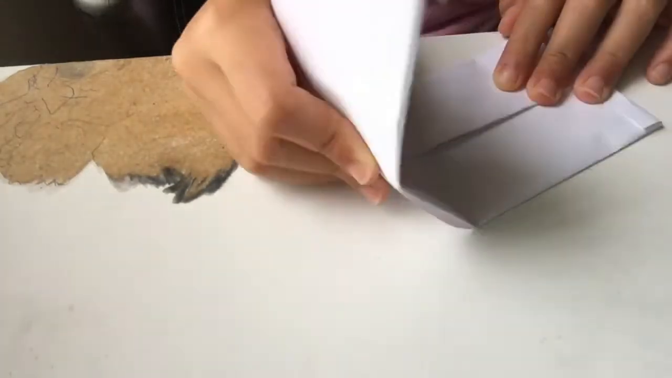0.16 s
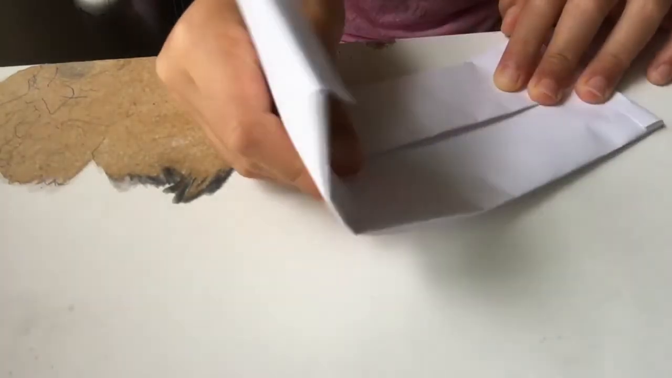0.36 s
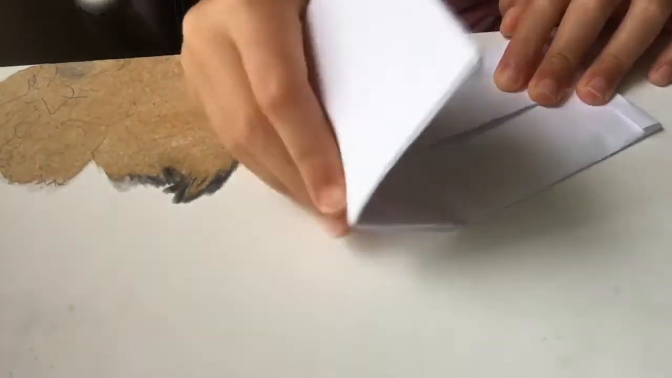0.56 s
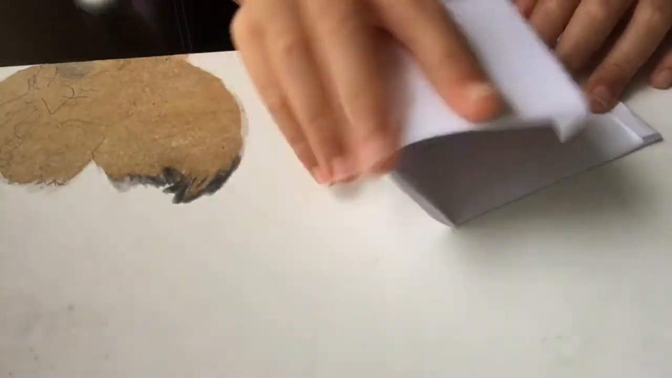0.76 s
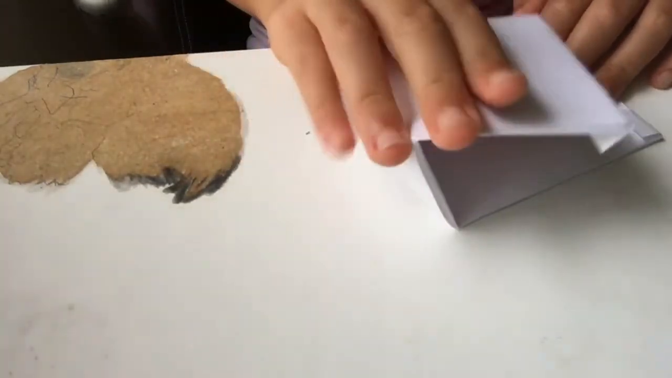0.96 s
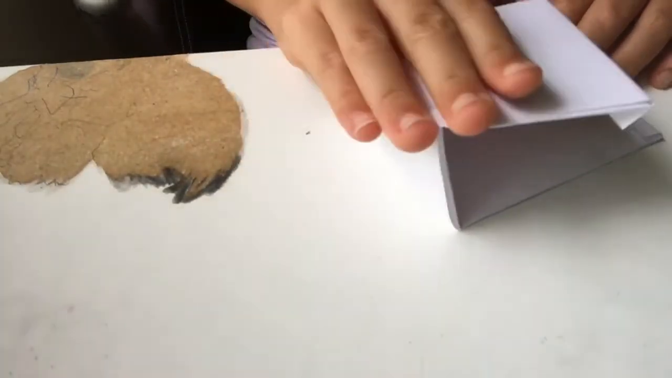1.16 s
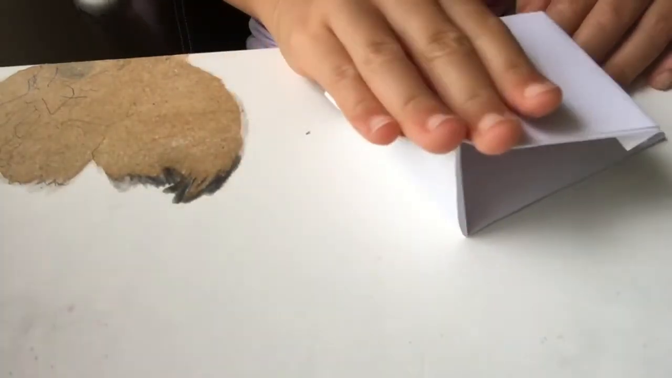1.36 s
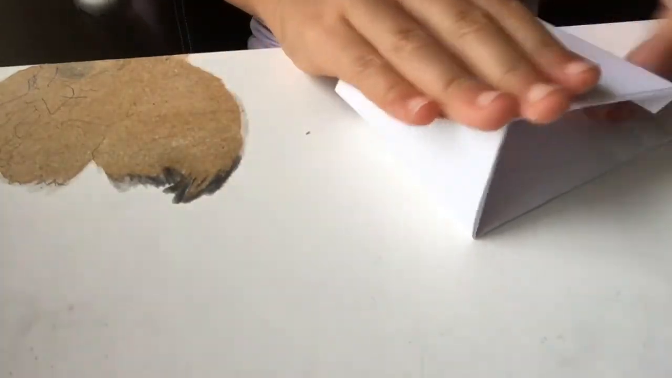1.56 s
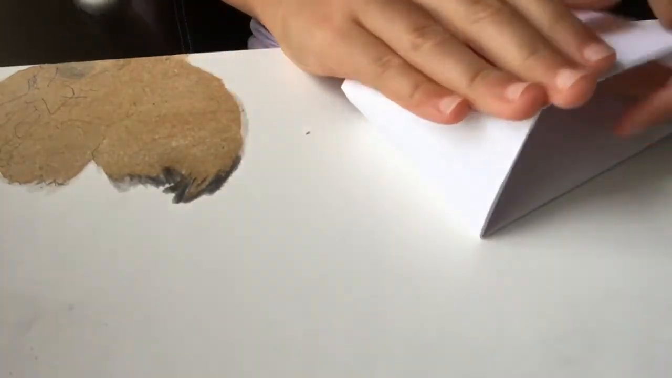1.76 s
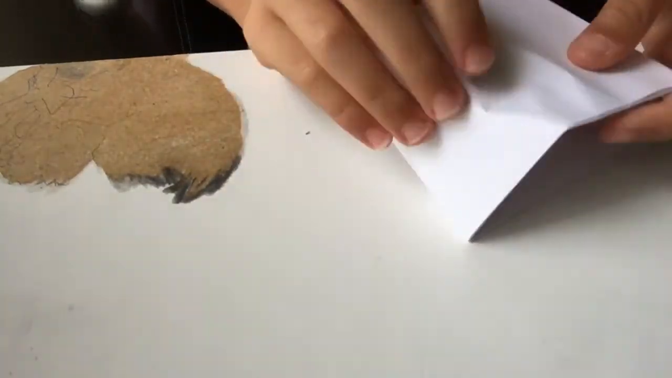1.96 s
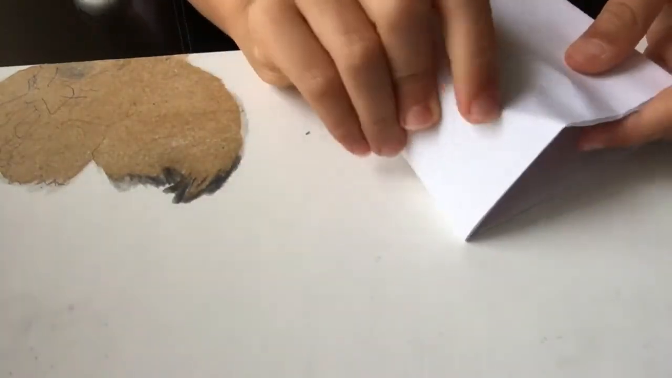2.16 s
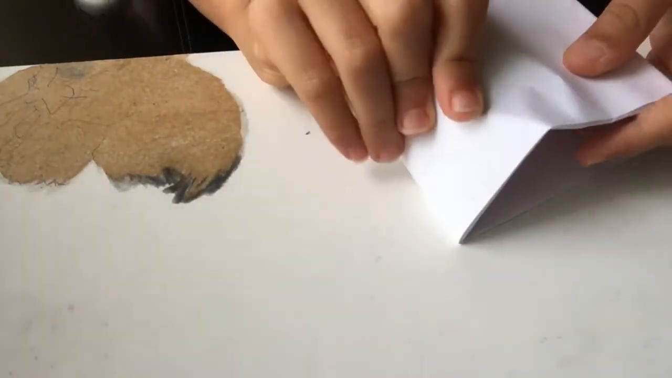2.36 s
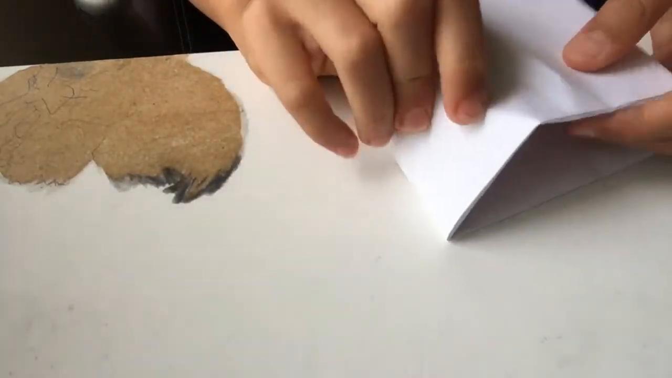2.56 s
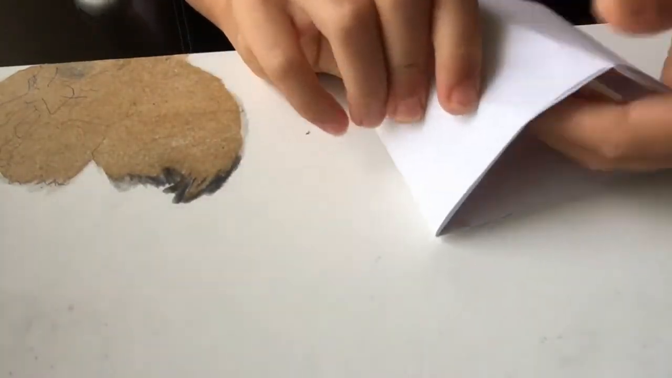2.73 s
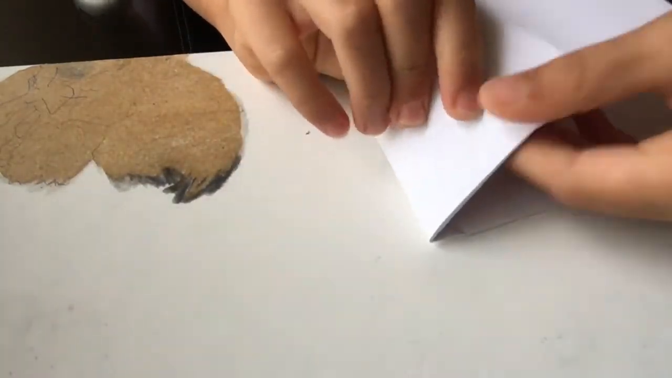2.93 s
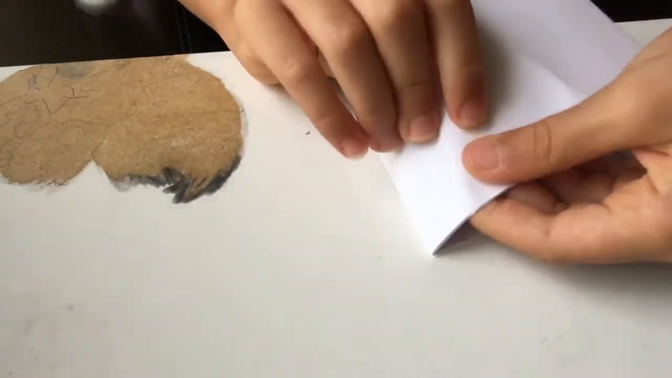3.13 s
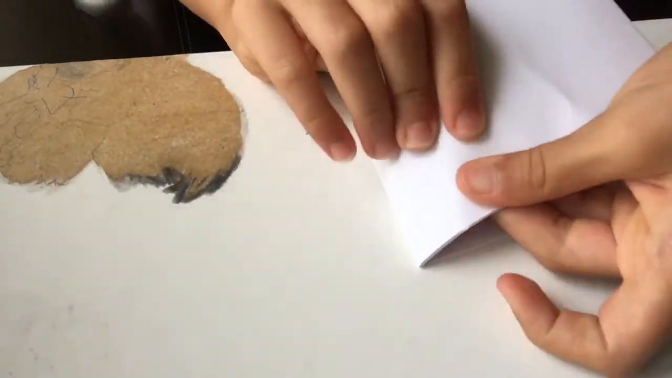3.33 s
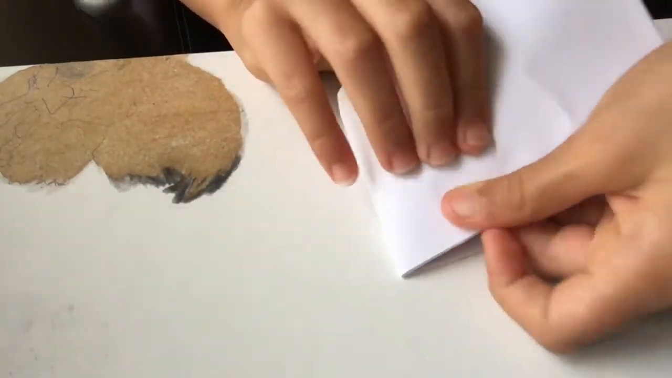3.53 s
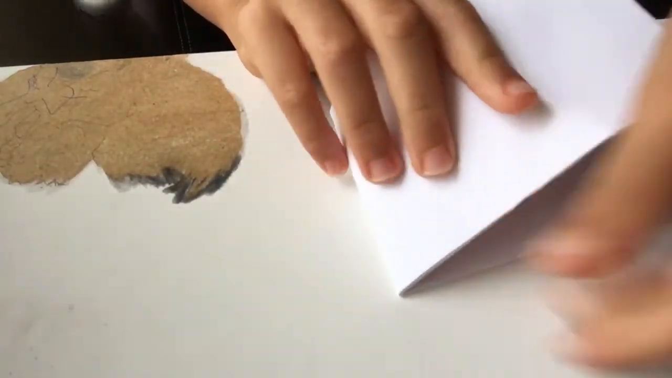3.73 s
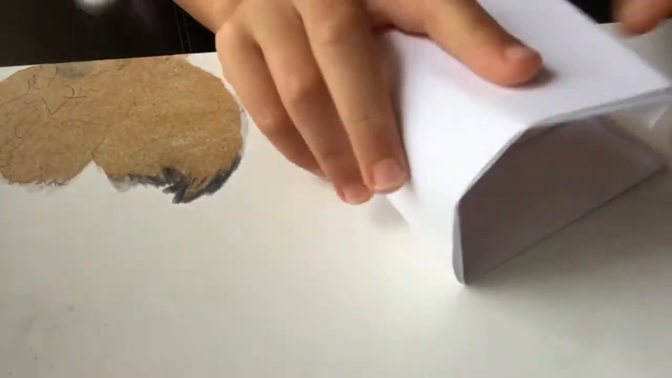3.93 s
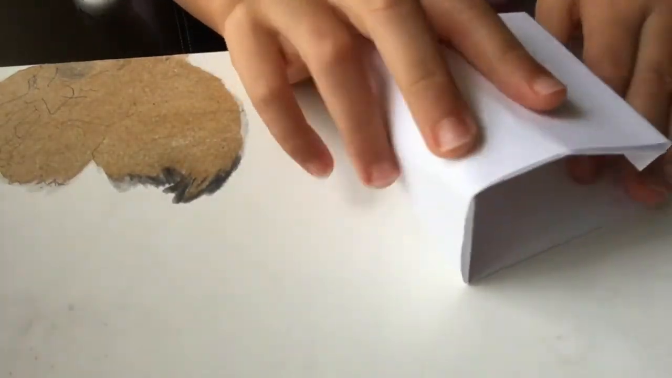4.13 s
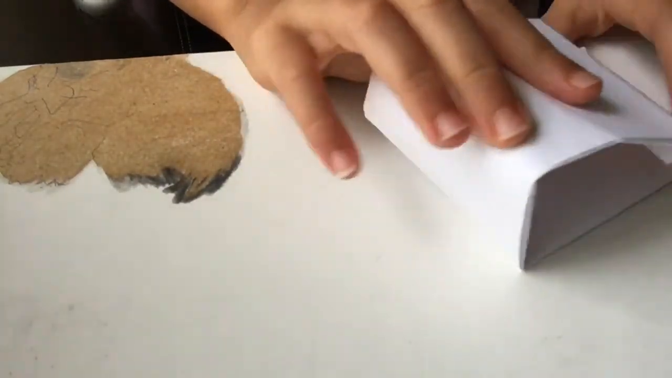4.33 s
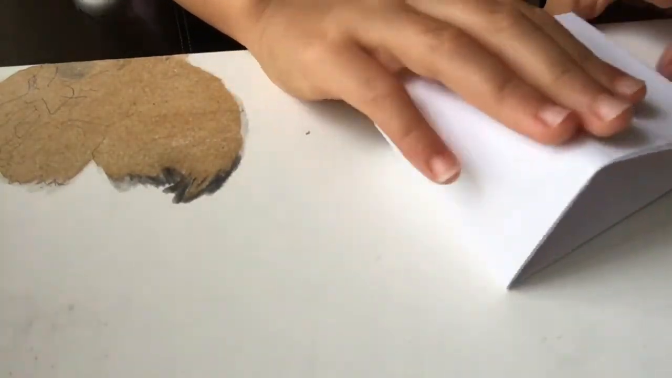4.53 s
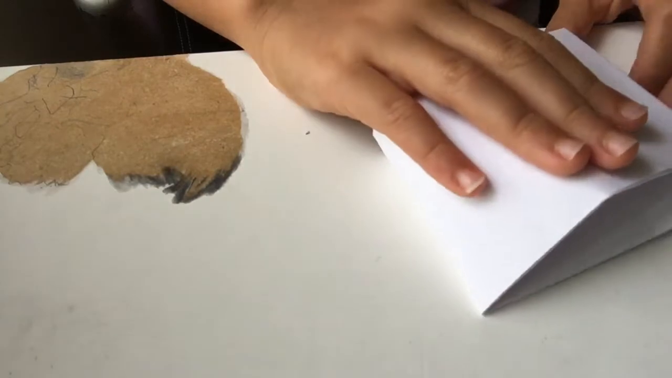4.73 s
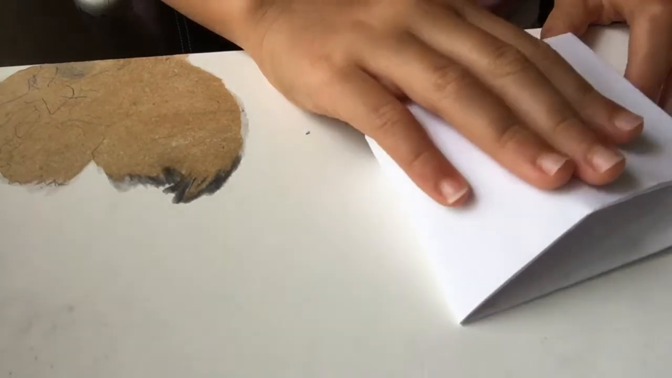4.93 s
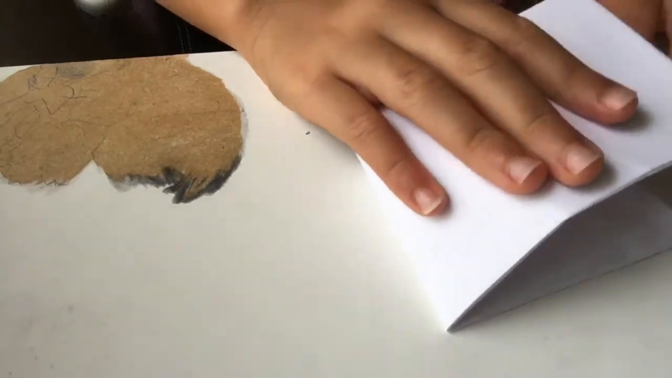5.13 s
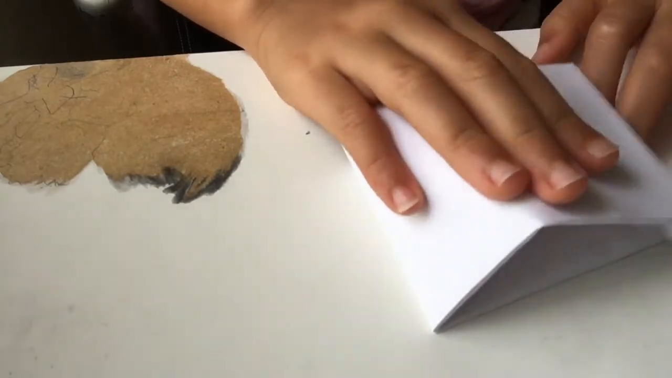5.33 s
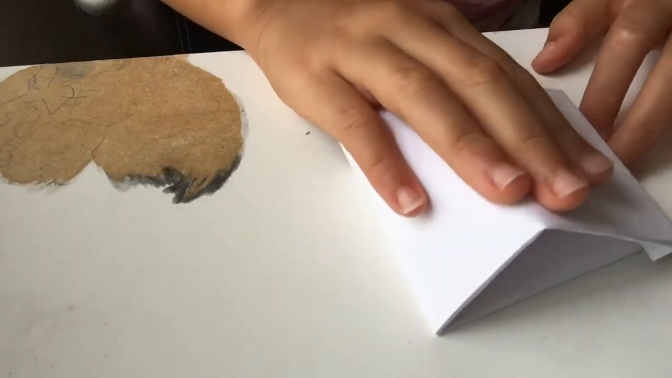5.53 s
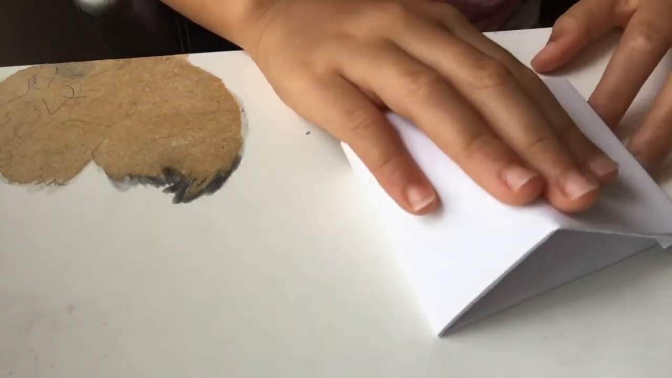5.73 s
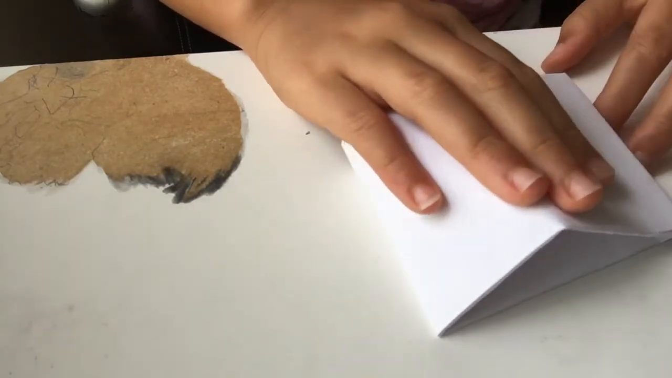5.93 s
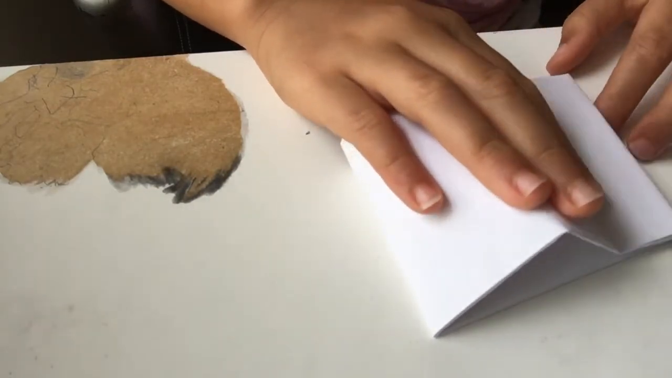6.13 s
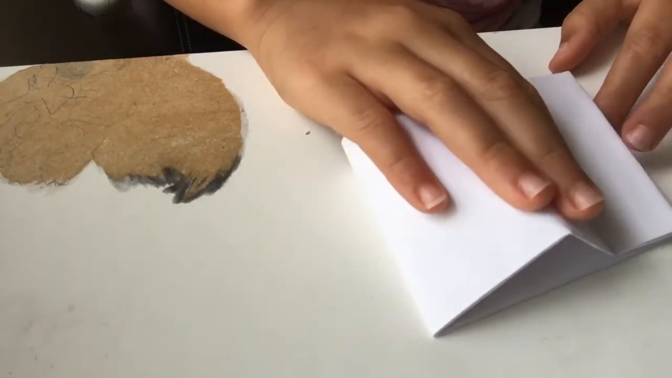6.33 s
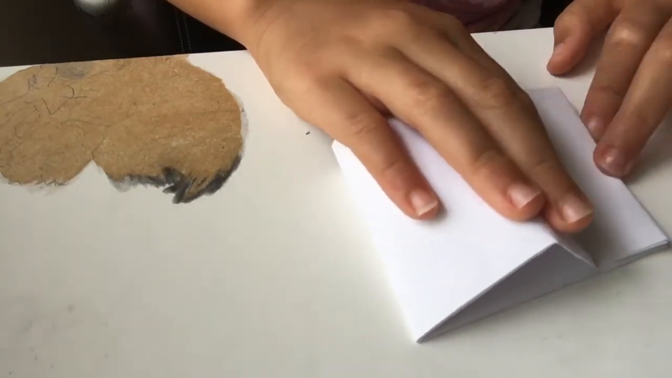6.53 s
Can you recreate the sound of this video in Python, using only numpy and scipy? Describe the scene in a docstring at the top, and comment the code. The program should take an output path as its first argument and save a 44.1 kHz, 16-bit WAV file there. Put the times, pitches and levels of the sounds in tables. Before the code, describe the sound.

Close to the microphone, stiff paper rustles and scrapes in short, uneven strokes as it is folded and creased on a table. Crisp snaps stand out early and again midway, while fingers land with dull thuds. The handling then turns quieter, until faint fingertip squeaks and a quick run of small snaps near the end. The small room adds a brief echo, a low rumble and a faint passing hum.

```python
"""In a small bare room, hands fold a stiff sheet of paper on a table close to a phone.
The sheet buckles with short snaps, rustles as its fibres catch and let go, and squeaks
under a fingertip. Fingers knock the table top. The room answers the paper with a short
echo, over a low rumble and a passing hum."""
import sys
import numpy as np
from scipy import signal
from scipy.fft import rfft, irfft
from scipy.io import wavfile
from scipy.ndimage import uniform_filter1d

SR = 44100
rng = np.random.default_rng(int(sys.argv[2]) if len(sys.argv) > 2 else 0)


def put_to_file(sound):
    """Save the sound as 16-bit audio at rate SR, in the file named by the first command-line argument."""
    columns = np.atleast_2d(sound).T  # one column per channel
    safe = np.clip(columns, -1, 1)
    whole_steps = np.round(safe * 32767)
    wavfile.write(sys.argv[1], SR, whole_steps.astype(np.int16))


N = 290178
T = np.arange(N) / SR

# Paper sliding over paper and table: start_s, swell_s, hold_s, scrape_db, hiss_db, extra_treble_db
STROKES = [(0.085, 0.046, 0.146, -60, -64, -4), (0.18, 0.02, 0.011, -51, -63, -4),
           (0.191, 0.064, 0.041, -64, -61, 3), (0.506, 0.008, 0.052, -52, -56, 3),
           (0.54, 0.019, 0.04, -51, -58, -3), (0.63, 0.009, 0.107, -54, -58, 2),
           (0.722, 0.069, 0.09, -60, -67, -4), (0.879, 0.06, 0.01, -55, -57, -3),
           (1.02, 0.007, 0.093, -57, -56, 2), (1.115, 0.018, 0.024, -69, -63, -2),
           (1.26, 0.008, 0.009, -52, -60, -3), (1.382, 0.041, 0.108, -66, -67, -1),
           (1.526, 0.034, 0.053, -62, -61, 0), (1.585, 0.018, 0.022, -61, -58, -3),
           (1.677, 0.087, 0.08, -57, -61, 1), (1.867, 0.048, 0.005, -54, -51, -1),
           (1.912, 0.071, 0.074, -55, -61, 3), (2.284, 0.055, 0.079, -62, -69, 2),
           (2.482, 0.063, 0.39, -68, -63, 2), (2.513, 0.082, 0.008, -54, -67, 6),
           (2.604, 0.07, 0.003, -59, -58, -1), (2.746, 0.038, 0.004, -52, -58, 3),
           (2.88, 0.024, 0.156, -64, -61, 3), (3.092, 0.011, 0.023, -50, -52, 1),
           (3.152, 0.022, 0.013, -54, -54, 5), (3.208, 0.058, 0.058, -60, -67, 1),
           (3.334, 0.022, 0.019, -59, -63, 3), (3.4, 0.048, 0.098, -59, -63, -2),
           (3.455, 0.133, 0.079, -47, -49, -3), (3.642, 0.027, 0.032, -54, -53, 3),
           (3.681, 0.02, 0.057, -59, -59, 1), (3.755, 0.046, 0.064, -51, -58, -2),
           (3.831, 0.016, 0.077, -62, -63, 2), (3.892, 0.118, 0.017, -59, -60, -4),
           (4.068, 0.04, 0.044, -59, -63, 3), (4.141, 0.05, 0.025, -57, -51, 3),
           (4.196, 0.031, 0.023, -52, -54, -3), (4.223, 0.108, 0.109, -53, -64, -2),
           (4.402, 0.02, 0.022, -55, -67, -2), (4.406, 0.073, 0.028, -64, -61, 1),
           (4.572, 0.029, 0.024, -65, -73, 2), (4.649, 0.038, 0.019, -57, -59, 0),
           (4.776, 0.074, 0.003, -65, -69, 3), (4.904, 0.016, 0.004, -75, -59, 1),
           (5.034, 0.031, 0.04, -71, -72, 1), (5.151, 0.042, 0.055, -58, -62, -1),
           (5.218, 0.021, 0.028, -58, -59, -5), (5.301, 0.034, 0.035, -56, -68, -1),
           (5.367, 0.012, 0.014, -75, -64, -7), (5.558, 0.05, 0.023, -61, -64, -2),
           (5.66, 0.014, 0.02, -57, -59, 3), (5.675, 0.014, 0.008, -50, -58, -3),
           (5.748, 0.027, 0.02, -50, -56, -3), (5.817, 0.081, 0.003, -55, -60, -4),
           (5.971, 0.083, 0.012, -59, -59, -4), (6.05, 0.041, 0.02, -46, -48, -2),
           (6.153, 0.013, 0.169, -56, -66, -8), (6.342, 0.01, 0.056, -47, -50, -5),
           (6.393, 0.014, 0.012, -48, -46, -3), (6.485, 0.029, 0.11, -69, -72, -5)]
# The tone of the paper's hiss: pitch_hz, level_db
HISS_TONE = [(1500, -25), (2400, -10), (3500, 0.5), (4800, -5), (6500, -2), (8500, -6.5), (10500, -4),
             (12500, -9.5), (15000, -16), (16500, -17)]


def snaps():
    """Each buckle rings a panel, pops the sheet and cracks the crease; gives direct sound and echo feed."""
    # The buckles: start_s, level_db, ring_hz, crease_hz, crease_db, crack_db, tilt_db_per_octave, echo_db
    buckles = [(0.005, -17, 1410, 3160, -16, -18, -7.5, 0), (0.183, -38, 1650, 2440, -13, -28, -12, 8),
               (0.511, -36.5, 930, 2700, -8, -23, 9, 4), (0.535, -31, 1110, 2640, -9, -26, 0, -12),
               (0.557, -26.5, 1460, 2490, -11, -26, 6, -9), (0.592, -32, 1080, 2650, -19, -28, 0, 0),
               (0.641, -32, 1050, 2620, -9, -19, 0, -12), (0.671, -31.5, 1050, 2490, -16, -26, 3, -11),
               (0.732, -34, 1020, 2480, -16, -30, 0, -7), (0.817, -35, 1480, 2540, -14, -25, -5, -14),
               (0.858, -21, 1420, 2420, -27, -26.5, -9.5, -3.5), (0.913, -39, 1980, 2450, -18, -21, -3, -4),
               (0.933, -36, 1130, 3450, -6, -28, -9, -1.5), (1.004, -29.5, 1900, 4100, -14, -10.5, -6, 6.5),
               (1.021, -15.5, 2100, 2430, -12, -13, 6, -1.5), (1.173, -39, 2070, 2430, -15, -25, 3, 5.5),
               (1.263, -30, 1010, 2380, -26, -29, 0, -7), (1.454, -45, 1330, 2500, -8, -25, 0, 0),
               (1.489, -47.5, 1040, 3330, 0.6, -32, 0, 4), (1.556, -37, 1150, 2470, -13, -24, 0, -2.5),
               (1.769, -36.5, 1050, 3550, -21, -27, 3, -13), (1.787, -36, 1150, 2480, -22, -32, 0, -8),
               (1.907, -39, 1270, 5470, 0.6, -13.5, 13, -1.5), (1.948, -40.5, 1680, 6040, -9, -25, 0, 0),
               (2.028, -32, 1630, 2570, -34, -31, 13, 4.5), (2.611, -36, 1020, 3300, -21, -23, 0, -16),
               (2.694, -37.5, 860, 3400, -28, -20.5, 0, -11), (2.812, -37, 1090, 2520, -27, -25, 6, -12),
               (3.011, -11.5, 1274, 6320, -16.5, -13.5, 1.5, -0.6),
               (3.5, -26.5, 1590, 2390, -17, -25.5, -4, -9), (3.505, -28, 1160, 2830, -22, -29, 0, -7),
               (3.515, -29.5, 1190, 2400, -16, -24, -6, -6),
               (3.585, -9.5, 1140, 3400, -17.5, -23, -12.5, -2.5),
               (3.797, -17.5, 1165, 2570, -22, -42, 3, -7), (3.848, -33, 1300, 3860, -24, -29, 0, 5),
               (4.014, -19.5, 1450, 2650, -14, -31, -13, -3.5), (4.105, -39.5, 1560, 2570, -11, -24, 3, 4),
               (4.217, -35, 1090, 3200, 1.5, -17, 0, 0), (4.695, -37, 1470, 2530, -12, -24, -5, -3),
               (4.921, -50, 1250, 5950, -2.5, -16, 17, 3), (5.124, -38, 1390, 2470, -21, -31, -3, -2.5),
               (5.246, -36.5, 1540, 3330, -12, -23, 0, 0), (5.259, -40.5, 1390, 3340, -3.5, -17, -3, 0),
               (5.273, -41, 1390, 3340, -5, -16, 0, 0), (5.327, -38, 1160, 2560, -21, -28, 0, 7.5),
               (5.387, -37, 1290, 2470, -25, -18.5, -5.5, -2.5), (5.545, -31.5, 1240, 3320, -32, -33, 8, 0),
               (5.99, -37, 1340, 2420, -18, -34, -6, -2.5), (6.083, -23, 1230, 2690, -16.5, -17, -6, -3.5),
               (6.116, -31, 990, 2520, -25, -22, 0, -6), (6.172, -29, 1200, 2400, -24, -27, -9, 3),
               (6.208, -34, 1270, 2500, -21, -29, -8, 0), (6.252, -30, 1170, 2480, -27, -41, -3, -7),
               (6.288, -35, 1270, 2380, -16, -34, -3, -4), (6.308, -34, 1230, 2610, -26, -37, -3, -5),
               (6.329, -33, 1230, 2500, -22, -34, -3, -3), (6.56, -38, 1250, 2400, -22, -36, 0, -4)]
    # The tone of the whole sheet's pop: pitch_hz, level_db
    pop_tone = [(150, -59), (400, 6.5), (800, -0.5), (1300, 11.5), (2000, 8.5), (3500, -26.5), (6000, -48)]
    # The crease's band of sound: offset_octaves, level_db
    crease_band = [(-0.89, -62), (-0.77, -9), (0, 3.5), (-0.19, -4.5), (1.0, -14.5)]
    buckles = buckles + small_buckles()
    direct, echo_feed, t = np.zeros(N), np.zeros(N), np.arange(1024) / SR
    noises = rng.standard_normal((len(buckles), 3, len(t)))
    click = signal.unit_impulse(len(t), 40)
    hiss_hz, hiss_db = np.transpose(HISS_TONE)
    for (start, db, ring_hz, crease_hz, crease_db, crack_db, tilt, echo_db), noise in zip(buckles, noises):
        ring_s = 0.014 - 0.0001 * (db + 35)  # harder snaps die sooner
        ring = np.sin(2 * np.pi * ring_hz * t) * fade(t, ring_s) * (1 - np.exp(-t / 0.0002))
        crease_tone = [(crease_hz * 2 ** octaves, level) for octaves, level in crease_band]
        crack_tone = np.transpose([hiss_hz, hiss_db + tilt * np.log2(hiss_hz / 6000)])
        tones = [pop_tone, crease_tone, crack_tone]
        gains = gain([-3.5, crease_db + 2, crack_db + 8])
        ragged = gains * [0.3, 1, 1]  # the pop is mostly one clean push
        burst = sum(g * colour(n, tone) for g, n, tone in zip(ragged, noise, tones))
        burst *= np.clip(t / 0.001, 0, 1) * fade(t, 0.02)
        push = gain(-14) * sum(g * colour(click, tone) for g, tone in zip(gains, tones))
        push *= np.clip(t / 0.00078, 0, 1) * fade(t, 0.018)
        add(direct, start, gain(db) * (ring + burst + 0.3 * push))
        add(echo_feed, start, gain(db + echo_db) * (0.55 * ring + push))
    return direct, echo_feed


def small_buckles():
    """Each stroke sets off two small buckles at random moments; gives extra rows for snaps()."""
    rows = []
    for start, swell, hold, scrape_db, *_ in STROKES:
        for when, force, ring, crease in rng.random((2, 4)):
            rows.append((start + swell + (hold + 0.03) * when, scrape_db + 5 + 8 * force,
                         1250 * 2 ** (ring - 0.5), 3000 * 2 ** crease, -15, -23, 0, 0))
    return rows


def rustle():
    """Fibres catch and let go: big slips scrape, fine ones hiss. The tone wanders as the sheet bends."""
    # The notes of the folded sheet: pitch_hz, width_hz, level_db
    sheet_notes = [(870, 90, -8), (1158, 210, 8.5), (1470, 330, 5), (1510, 100, -5.5), (1950, 50, -15.5),
                   (2470, 110, -12)]
    # The tone of the scraping: pitch_hz, level_db
    scrape_tone = [(300, -30), (600, -9), (850, -8), (1150, -2), (1600, -3), (2200, -3.5), (3000, -19.5),
                   (4500, -18), (7000, -35)]
    # The tone of the tiny crinkles: pitch_hz, level_db
    crinkle_tone = [(1800, -22), (2500, 0.5), (6000, -2.5), (10000, -9.5), (16500, -9)]
    scrape_gain, hiss_gain, treble_gain = stroke_gains()
    patchy = gain(1.5 * wander(50))
    sheet = sum(gain(db + 4 * wander(14)) * ringing(slips(400, 3), hz, width)
                for hz, width, db in sheet_notes)
    scrape = normalise(colour(slips(2500, 2.6), scrape_tone) + gain(-1) * normalise(sheet))
    crinkles = sum(gain(4.5 * wander(16)) * ringing(slips(500, 3.5), hz, hz / 14)
                   for hz in 2500 * 2 ** np.arange(0, 2.6, 0.17))
    hiss = normalise(colour(slips(10000, 1.8), HISS_TONE) + gain(-2) * colour(crinkles, crinkle_tone))
    low_hiss = signal.sosfilt(signal.butter(2, 8000, fs=SR, output="sos"), hiss)
    return (scrape * scrape_gain + low_hiss * hiss_gain + (hiss - low_hiss) * treble_gain) * patchy


def stroke_gains(let_go_db_per_s=216):
    """How strong scrape, hiss and treble are as each stroke swells, holds and dies away."""
    # The sheet stirring under a resting hand: scrape_db, hiss_db, treble_db
    resting = [-68, -75.5, -78]
    t = T[::64]
    power = np.ones((3, len(t))) * gain(resting)[:, None] ** 2
    for start, swell, hold, scrape_db, hiss_db, treble_db in STROKES:
        rise = np.clip((t - start) / swell, 0, 1) ** 2
        fall = gain(-let_go_db_per_s * np.maximum(t - start - swell - hold, 0))
        power += (rise * fall * gain([scrape_db, hiss_db, hiss_db + treble_db])[:, None]) ** 2
    return [np.interp(T, t, np.sqrt(p)) for p in power]


def slips(per_s, scatter_db):
    """Tiny clicks of very uneven size, made as paper sticks and slips."""
    when, side, size = rng.random((3, N))
    size_db = scatter_db * np.minimum(-np.log(1 - size), 4)
    return (when < per_s / SR) * np.sign(side - 0.5) * gain(size_db)


def squeaks():
    """A fingertip dragged along the crease makes the fold sing one note."""
    # Fingertip drags: middle_s, half_length_s, pitch_hz, level_db
    drags = [(1.615, 0.022, 1850, -58), (5.708, .02, 1164, -47), (5.79, 0.034, 1240, -53),
             (5.898, .03, 1160, -53.5), (6.385, 0.08, 1260, -52)]
    out = np.zeros(N)
    for middle, half_length, hz, db in drags:
        swell = np.clip(1 - ((T - middle) / half_length) ** 2, 0, 1)
        out += gain(db) * swell * ringing(slips(1500, 2), hz, width_hz=70)
    return out


def knocks():
    """Each soft blow thuds at its own pitch and sets the table top ringing."""
    # Fingers and palm landing: start_s, level_db, pitch_hz, fade_s, table_db
    blows = [(0.531, -33, 71.4, 0.044, -9.5), (0.592, -24.5, 133, 0.033, -15),
             (1.259, -25.5, 141, 0.05, -9.5), (1.274, -31, 74.6, 0.068, -16),
             (3.499, -32, 105, 0.079, -14.5), (3.583, -34, 110, 0.077, -13.5),
             (4.201, -21, 160, 0.047, -12), (4.214, -27.5, 65, 0.06, -12), (4.439, -27, 109, 0.041, -15),
             (6.079, -31.5, 84.5, 0.06, -10.5)]
    # The notes of the table top: pitch_hz, level_db
    table_notes = [(105, 10), (290, -1), (420, 3.5)]
    out, t = np.zeros(N), np.arange(16384) / SR
    table = sum(gain(db) * np.sin(2 * np.pi * hz * t) for hz, db in table_notes)
    for start, db, hz, fade_s, table_db in blows:
        thud = np.sin(2 * np.pi * hz * t) * fade(t, fade_s)
        ring = gain(table_db) * table * fade(t, 1.9 * fade_s)
        add(out, start, gain(db) * (thud + ring) * (1 - np.exp(-t / 0.0056)))
    return out


def room_echo(x, gap_s=0.0027, build_s=0.0069):
    """The room's echo builds after a short gap; each band of pitch fades at its own rate."""
    # How long the room rings: pitch_hz, fade_s
    echo_times = [(300, 0.42), (800, 0.22), (2000, 0.31), (5500, 0.31), (14000, 0.38)]
    pitches, fades = np.transpose(echo_times)
    tail, t = 0, np.arange(SR // 2) / SR
    for hz in 200 * 2 ** np.arange(0, 6.6, 0.5):
        band = signal.butter(2, [hz / 2 ** 0.25, min(hz * 2 ** 0.25, 20000)], "band", fs=SR, output="sos")
        fade_s = np.interp(np.log(hz), np.log(pitches), fades)
        tail += signal.sosfilt(band, rng.standard_normal(len(t))) * fade(t, fade_s)
    tail *= np.clip((t - gap_s) / build_s, 0.08, 1)
    return signal.fftconvolve(x, tail / np.sqrt(np.sum(tail ** 2)))[:N]


def room_noise():
    """A soft rush of air, and the room's own notes swelling with far-off rumble."""
    # The tone of the quiet room: pitch_hz, level_db
    air_tone = [(15, -29), (25, -18.5), (120, 3), (170, -6), (326, -6), (560, -16.5), (1160, -22.5),
                (1370, -28), (1520, -16.5), (2550, -90.5), (2910, -57), (3160, -53), (3430, -63),
                (8360, -53), (16000, -39.5)]
    # The notes of the room: pitch_hz, width_hz, level_db
    room_notes = [(59.2, 12.6, -53.5), (85, 60, -65.5), (114.2, 9, -57.5), (167.2, 6.6, -63),
                  (214.5, 4.9, -71.5), (297.8, 7.7, -68.5), (1063, 12, -70)]
    # The rise and fall of the rumble: time_s, level_db
    swells = [(0, 0), (.5, 2.5), (1.2, 4), (1.4, 3.5), (2, 2), (2.3, 0), (3, 1.5), (3.6, 5), (4.2, 3),
              (4.6, 0.5), (5.2, -0.5), (5.8, 3), (6.58, 1.5)]
    air = gain(-54 + 0.67 * wander(3.1)) * colour(rng.standard_normal(N), air_tone)
    rumble = sum(gain(db + 1.37 * wander(3.96)) * ringing(rng.standard_normal(N), hz, width)
                 for hz, width, db in room_notes)
    return air + gain_curve(swells) * rumble


def hum(pitch_hz=101):
    """A low, slightly wavering hum comes and goes."""
    # The rise and fall of the hum: time_s, level_db
    levels = [(1.15, -86), (1.3, -46.5), (1.7, -50.5), (2.0, -52.5), (2.35, -53), (2.6, -49), (2.8, -80)]
    phase = 2 * np.pi * np.cumsum(pitch_hz + 1.5 * wander(6)) / SR
    return np.sqrt(2) * np.sin(phase) * gain(1.5 * wander(8)) * gain_curve(levels)


def gain(db):
    return 10 ** (np.asarray(db) / 20)


def gain_curve(points):
    return gain(np.interp(T, *np.transpose(points)))


def normalise(x):
    return x / np.sqrt(np.mean(x ** 2))


def colour(x, tone):
    """Give x a tone made of (pitch_hz, level_db) points, at strength 1."""
    hz, db = np.transpose(tone)
    log_hz = np.log(np.fft.rfftfreq(len(x), 1 / SR) + 1)
    shape = gain(np.interp(log_hz, np.log(hz), db, left=-90, right=-90))
    return normalise(irfft(rfft(x) * shape, len(x)))


def ringing(x, hz, width_hz):
    """Make x ring at one pitch, at strength 1."""
    return normalise(signal.lfilter(*signal.iirpeak(hz, hz / width_hz, fs=SR), x))


def wander(per_s):
    """A smooth random drift, typically about 1 in size."""
    step = int(SR / per_s)
    levels = np.repeat(rng.standard_normal(N // step + 1), step)
    return normalise(uniform_filter1d(uniform_filter1d(levels, step), step)[:N])


def fade(t, fade_s):
    """Die away by 60 dB in fade_s seconds."""
    return np.exp(-np.log(1000) * t / max(fade_s, 0.002))


def add(out, start_s, sound):
    i = min(int(start_s * SR), N)
    out[i:i + len(sound)] += sound[:N - i]


def scene():
    """Paper, knocks, the paper's echo and the background, in one channel."""
    snapping, echo_feed = snaps()
    rubbing = rustle() + squeaks()
    into_room = gain(-6) * echo_feed + gain(-13.5) * rubbing
    return (snapping + rubbing + knocks() + room_echo(into_room) + room_noise() + hum())[None]


def record(dry):
    """The phone drops the deepest bass, has a narrow dip in the treble and cuts the top."""
    dry = signal.sosfilt(signal.butter(2, 40, "high", fs=SR, output="sos"), dry)
    dry = 0.4 * dry + 0.52 * signal.lfilter(*signal.iirnotch(10500, 8, fs=SR), dry)
    return signal.sosfilt(signal.ellip(10, 0.2, 80, 15750, fs=SR, output="sos"), dry)


dry = scene()
out = record(dry)
put_to_file(out)
```